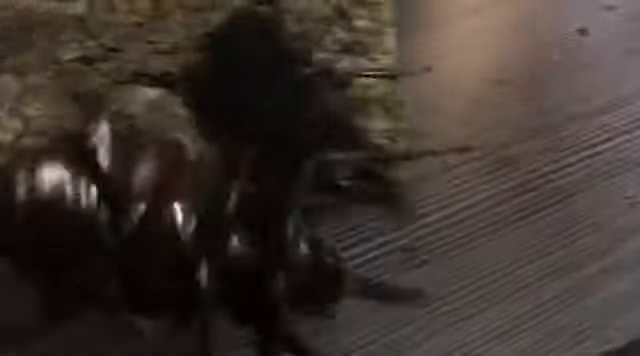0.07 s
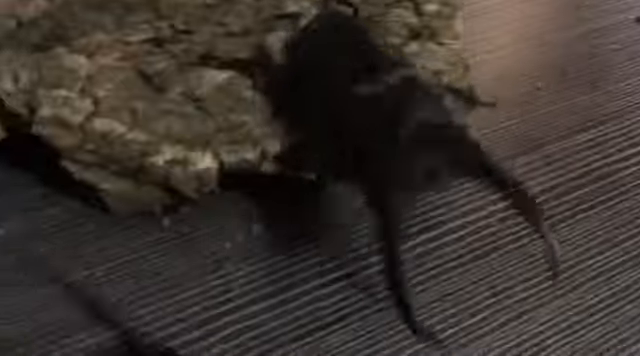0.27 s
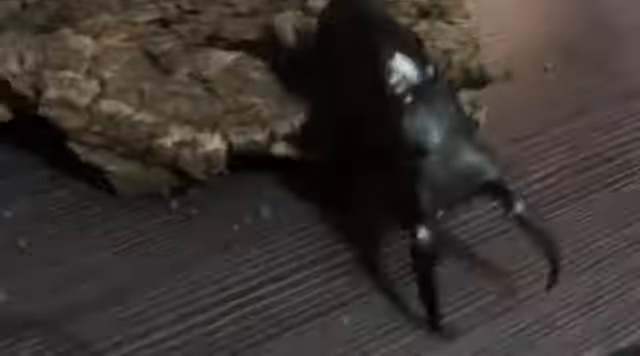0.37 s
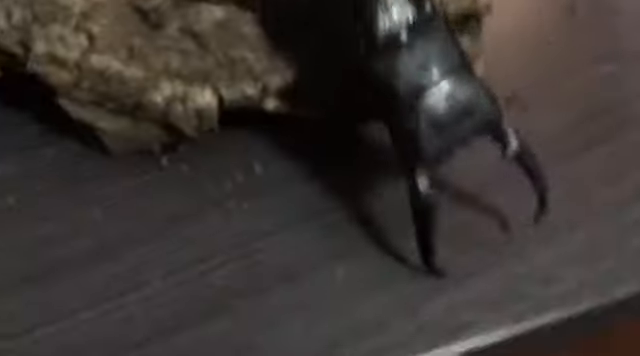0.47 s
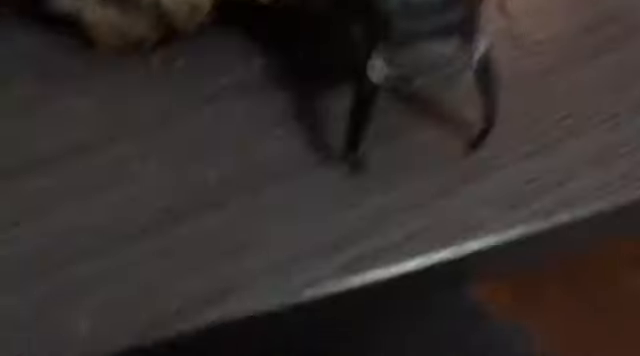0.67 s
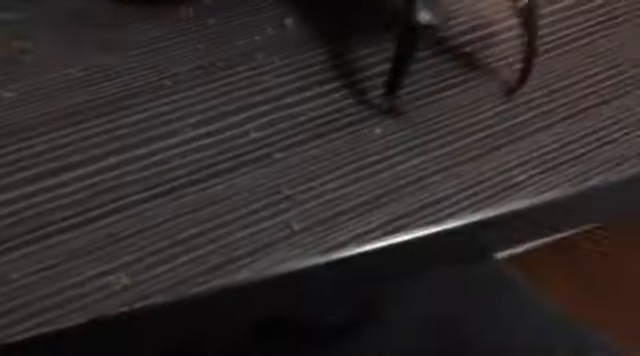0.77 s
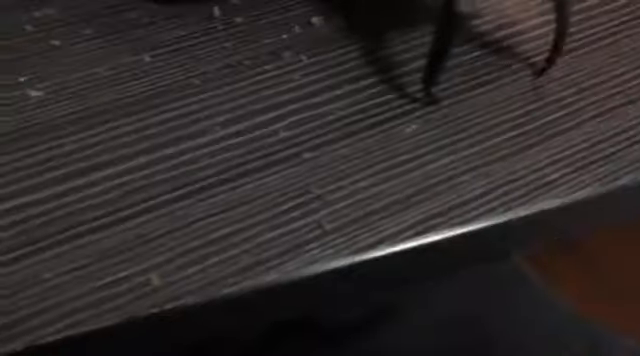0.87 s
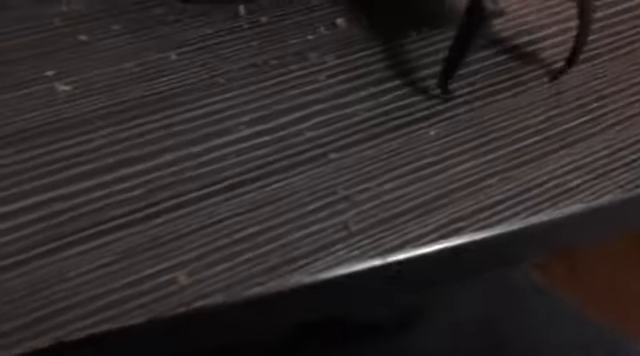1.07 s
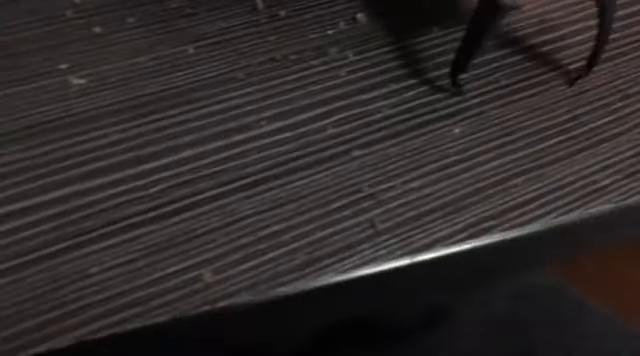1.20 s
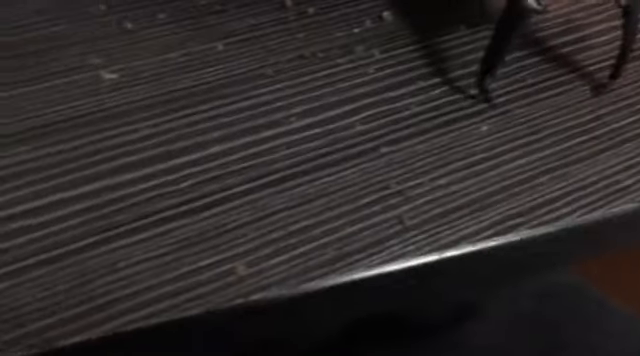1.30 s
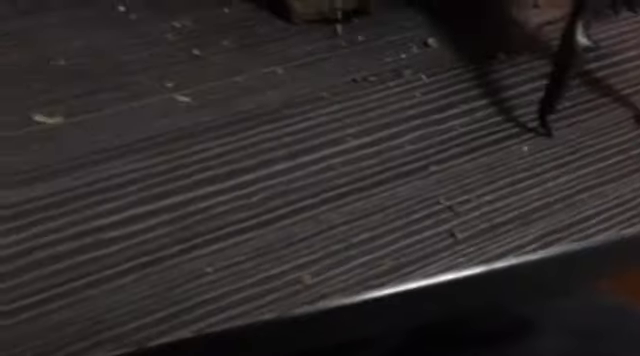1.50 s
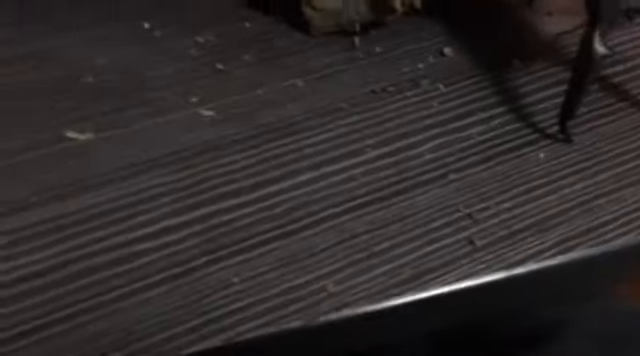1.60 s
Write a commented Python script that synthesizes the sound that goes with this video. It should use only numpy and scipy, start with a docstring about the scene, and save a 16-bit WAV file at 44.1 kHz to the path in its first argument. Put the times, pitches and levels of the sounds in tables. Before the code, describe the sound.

Small clicks and scratches of scuffling beetles, with bark knocking and rattling on wood.

```python
"""Stag beetles scuffling on bark

Two stag beetles scuffle on a piece of bark on a wooden table, close by, in a quiet room.
Claws scratch and shells click. The bark rocks, knocks on the table top and chatters to rest;
shifting weight thuds softly and legs drag over the wood. The room gives a short tail over a low hum."""
import sys
import numpy as np
from scipy import signal
from scipy.fft import rfft, irfft
from scipy.io import wavfile

SR = 44100
rng = np.random.default_rng(int(sys.argv[2]) if len(sys.argv) > 2 else 0)


def to_wav(s):
    """Save 16-bit WAV."""
    ch = np.atleast_2d(s).T  # columns
    pcm = np.round(np.clip(ch, -1, 1) * 32767)  # PCM
    wavfile.write(sys.argv[1], SR, pcm.astype(np.int16))


N = 72765

# Tone of the room air. Each row: frequency in Hz, relative level in dB.
AIR = [(25, -3.5), (45, -9.5), (86, -2), (150, -5.5), (230, -2), (320, -5), (450, -10), (776, -15),
       (1150, -12), (1770, -23), (3380, -35), (12000, -44.5)]
# Level curve of the claws scratching the bark. Each row: time in seconds, level in dB.
SCRATCH = [(0, -73.5), (0.152, -65.5), (.212, -59.5), (.236, -50), (.275, -69), (.33, -52.5), (.45, -56.5),
           (.53, -59), (.6, -57.5), (0.692, -54.5), (.75, -58), (.84, -64.5), (0.931, -63), (1.06, -69),
           (1.25, -73.5), (1.65, -74)]
# EQ of the scratching. Each row: frequency in Hz, gain in dB.
SCRATCH_COLOUR = [(150, -9), (700, 6), (2300, 3), (5000, -2.5), (9000, -4), (13000, -7)]
# Shell and claw clicks. Each row: start in seconds, snap level in dB, ring pitch in Hz,
# ring level in dB over the snap, crunch t60 in seconds.
CLICKS = [(0.0514, -38.5, 6200, -40, 0.023), (0.097, -35, 5590, 11, 0.0025), (0.1565, -45.5, 3000, 27, .01),
          (.176, -34, 6570, 2, 0.0044), (.205, -20.5, 2400, 9.5, 0.0041), (0.2091, -30, 7300, 6, 0.0044),
          (0.2149, -22.5, 8960, 25, 0.0053), (0.2285, -9.5, 5150, 14.5, 0.005),
          (0.253, -18, 8800, 11, 0.019), (.288, -18, 5800, 8, 0.015), (.3046, -10, 6560, 17.5, 0.021),
          (.32, -27, 4500, 15, .008), (0.4257, -12.5, 10900, 10, 0.013), (0.4606, -24, 3920, 10, 0.011),
          (0.654, -42.5, 3600, 28.5, 0.0081), (.681, -22.5, 3920, 18.5, 0.018),
          (0.6868, -22, 8600, -5, 0.047), (0.718, -25.5, 3450, 10, 0.023), (0.7757, -33.5, 3740, 19, 0.013),
          (.87, -25, 8700, 20.5, 0.012), (0.8712, -46, 3560, 33, 0.006),
          (0.9894, -27.5, 8500, 10.5, 0.0048), (0.9912, -40, 3440, 23.5, .005),
          (1.322, -40.5, 4600, 12.5, 0.011)]
# EQ of the clicks. Each row: frequency in Hz, gain in dB.
CLICK_COLOUR = [(100, -36), (1200, -23.5), (2800, -6), (6000, -4.5), (11000, -5.5), (14000, -6)]
# Knocks of bark on table. Each row: start in seconds, bark level in dB, table level in dB,
# ring length as a share of the free ring, bark pitch ratio, place across the table from 0 to 1.
KNOCKS = [(0.2494, -5.5, -5.5, 0.079, 0.92, 0.04), (0.3042, 4, -8, 0.38, 1.067, 0.04),
          (0.3062, 19, 5, 1, 0.99, 0.2), (0.3088, 5, 4, 0.45, 0.97, 0.18),
          (0.4273, -6, -1.5, 0.54, 1.007, 0.46), (0.6817, -8.5, -13, 0.25, 0.93, 0.52),
          (.6875, -10.5, -3, 0.83, 0.85, 0.45)]
# Resonances of the bark. Each row: frequency in Hz, peak in dB, t60 in seconds.
BARK_MODES = [(846, -4.5, 0.087), (1137, -9.5, 0.039), (1904, 6, 0.058), (2160, -1.5, 0.071),
              (2486, 1.5, 0.029), (2880, -11.5, 0.044), (3300, -14, 0.051), (3340, -32, 0.039)]
# Resonances of the table top. Each row: frequency in Hz, peak in dB, t60 in seconds.
TOP_MODES = [(608, 8, 0.05), (761, -1.5, 0.067), (1051, 1, 0.12), (1282, 6.5, 0.092)]
# EQ of the knocks and chatter. Each row: frequency in Hz, gain in dB.
KNOCK_COLOUR = [(100, -5), (450, -12), (700, -1.5), (3200, -0.5), (5000, -4.5), (12000, -3)]
# Weight settling on the table. Each row: start in seconds, level in dB, push length in seconds.
THUDS = [(.252, 14.5, 0.0075), (0.2543, 2, 0.0026), (.327, 10, 0.0052), (0.336, -2, 0.0024),
         (.409, -3, 0.002), (0.469, 1, 0.0069), (0.626, -3.5, 0.0036), (.683, -3.5, 0.0031),
         (.738, -6, 0.0028), (0.808, -0.5, 0.0079), (1.361, -8.5, 0.0045)]
# Low resonances of the table. Each row: frequency in Hz, peak in dB, t60 in seconds.
FRAME_MODES = [(63.4, -3, 0.042), (87, -6, 0.043), (131, -0.5, 0.24), (160.8, -1, 0.072),
               (196.6, -3.5, 0.061), (293, 8.5, 0.18), (346, 3, 0.057)]
# Dull leg drags. Each row: start in seconds, length in seconds, level in dB,
# place of the peak as a share of the length, gain of the table's ring in dB.
DRAGS = [(0.634, 0.035, -68, .42, 2), (0.684, 0.047, -57.5, .35, 0), (1.124, 0.1, -64.5, 0.5, 0),
         (1.25, 0.095, -64.5, .55, -4), (1.338, 0.054, -57.5, .66, 1), (1.498, 0.041, -51, 0.33, 4.5)]
# EQ of the drags. Each row: frequency in Hz, gain in dB.
DRAG_COLOUR = [(100, -9), (450, -18.5), (750, -2.5), (1180, 1), (1600, -5), (2200, -9), (4000, -27),
               (9000, -20), (13000, -29)]
# Decay of the room tail. Each row: frequency in Hz, t60 in seconds.
ROOM_T60 = [(100, 0.81), (300, 0.29), (800, 0.15), (2000, 0.2), (5000, 0.24), (12000, 0.038)]
# EQ of the room tail. Each row: frequency in Hz, gain in dB.
ROOM_COLOUR = [(60, -16.5), (200, -2.5), (450, -5.5), (800, -8), (2200, -14.5), (5000, -18), (12000, -18)]

AIR_DB, HUM_HZ, HUM_DB, HUM_WAVER = -60, 48.7, -57.5, 0.12
GRAINS_PER_S, GRAIN_SPREAD_DB = 7000, 2.2
SHELL_T60_S, CRUNCH_DB = 0.0032, 4
GRIP_S = 0.0069  # time in which the beetles' legs damp the bark
CHATTER_START_S, CHATTER_GAP_S, CHATTER_DB, CHATTER_T60_S = 0.3125, 0.0035, -11.5, 0.25
CHATTER_RING_SHARE, CHATTER_PITCH_SPREAD = 0.24, 0.13
LOW_CUT_HZ, EDGE_HZ, SKIRT_HZ, SKIRT_DB = 38.4, 12250, 14000, -25


def amp(db):
    """Decibels to gain."""
    return 10 ** (np.asarray(db) / 20)


def unit(x):
    """Scales to rms 1."""
    return x / np.sqrt(np.mean(x ** 2) + 1e-20)


def read(points, hz):
    """Reads a curve over log frequency."""
    f, value = np.transpose(points)
    return np.interp(np.log(hz + 1), np.log(f + 1), value)


def add(mix, start, sound):
    """Mixes a sound in at a start time in seconds."""
    part = mix[max(round(start * SR), 0):][:len(sound)]
    part += sound[:len(part)]


def colour(x, points):
    """Minimum-phase EQ, so nothing rings ahead of an attack."""
    log_gain = np.log(amp(read(points, abs(np.fft.fftfreq(8192, 1 / SR)))))
    response = np.exp(np.conj(signal.hilbert(log_gain)))
    taps = np.fft.ifft(response).real[:4096]
    return signal.fftconvolve(x, taps)[:len(x)]


def ring(modes, ring_share=1, size=SR // 2):
    """Struck modes dying away; each level is the height of the resonance."""
    t = np.arange(size) / SR
    out = np.zeros(size)
    for hz, db, t60 in modes:
        rate = np.log(1000) / (t60 * ring_share)
        out += amp(db) * 2 * rate / SR * np.exp(-rate * t) * np.cos(2 * np.pi * hz * t)
    out[0] /= 2
    return out


def room_tone():
    """A bed of soft air and a low, wavering hum."""
    t = np.arange(N) / SR
    waver = sum(np.exp(2j * np.pi * (hz * t + rng.random())) for hz in rng.uniform(-6, 3, size=20))
    waver /= np.sqrt(np.mean(abs(waver) ** 2))
    hum = (np.exp(2j * np.pi * HUM_HZ * t) * (1 + HUM_WAVER * waver)).real
    air_gain = amp(read(AIR, np.fft.rfftfreq(N, 1 / SR)))
    air = irfft(rfft(rng.standard_normal(N)) * air_gain, N)
    return amp(HUM_DB) * unit(hum) + amp(AIR_DB) * unit(air)


def friction():
    """A dense, grainy train of tiny slips of uneven size."""
    size = amp(GRAIN_SPREAD_DB * np.minimum(rng.exponential(1, N), 5))
    return unit(size * rng.standard_normal(N) * (rng.random(N) < GRAINS_PER_S / SR))


def claw_scratch():
    """Claws slip over the bark in a fine crackle."""
    level_db = np.interp(np.arange(N) / SR, *np.transpose(SCRATCH))
    return unit(colour(friction(), SCRATCH_COLOUR)) * amp(level_db)


def shell_clicks():
    """Each click layers a snap, a brief crunch of bark and a very short ring of shell."""
    out, t = np.zeros(N), np.arange(SR // 2) / SR
    for start, db, hz, ring_db, crunch_t60 in CLICKS:
        crunch = rng.standard_normal(len(t)) * amp(-60 * t / crunch_t60)
        shell = ring([(hz, ring_db, SHELL_T60_S)])
        click = amp(CRUNCH_DB) * crunch / np.linalg.norm(crunch) + shell
        click[0] += 1  # the snap
        add(out, start, amp(db) * click)
    return colour(out, CLICK_COLOUR)


def bark_knocks():
    """The bark strikes the table; the beetles' grip chokes it while the table top rings on."""
    out, t = np.zeros(N), np.arange(SR // 2) / SR
    grip = np.exp(-(t / GRIP_S) ** 2)
    for start, bark_db, table_db, ring_share, pitch, place in KNOCKS:
        bark = grip * ring([(hz * pitch, db, t60) for hz, db, t60 in BARK_MODES], ring_share)
        # where the blow lands sets the balance of the table's modes
        table = sum(np.sin(np.pi * k * place) * ring([mode], ring_share)
                    for k, mode in enumerate(TOP_MODES, 1))
        add(out, start, amp(bark_db) * bark + amp(table_db) * table)
    return colour(out, KNOCK_COLOUR)


def table_thuds():
    """Shifting weight pushes softly on the low modes of the table."""
    out = np.zeros(N)
    for start, db, length in THUDS:
        push = np.hanning(int(length * SR) + 3)
        add(out, start, amp(db) * signal.fftconvolve(ring(FRAME_MODES), push / push.sum()))
    return out


def bark_chatter():
    """After its hardest knock the bark bounces to rest, each time on another edge with its own pitch."""
    out = np.zeros(N)
    for k, (late, edge, force) in enumerate(rng.uniform(-0.89, 1, size=(28, 3))):
        delay = (k + late / 2) * CHATTER_GAP_S
        gain = amp(CHATTER_DB - 60 * delay / CHATTER_T60_S) * (1 + force / 2)
        modes = [(hz * (1 + CHATTER_PITCH_SPREAD * edge), db, t60) for hz, db, t60 in BARK_MODES]
        add(out, CHATTER_START_S + delay, gain * ring(modes, CHATTER_RING_SHARE, size=1500))
    return colour(out, KNOCK_COLOUR)


def leg_drags():
    """A sliding leg feeds small slips into the table top, swelling and fading."""
    out, t = np.zeros(N), np.arange(N) / SR
    slips = colour(friction(), DRAG_COLOUR)
    wood = signal.fftconvolve(slips, ring(TOP_MODES))[:N]
    for start, length, db, peak, ring_db in DRAGS:
        swell = np.sin(np.interp((t - start) / length, [0, peak, 1], [0, np.pi / 2, np.pi]))
        out += amp(db) * swell * unit(slips + amp(ring_db) * wood)
    return out


def room_tail(x):
    """A diffuse reverb that lingers in the bass and dies fastest at the very top."""
    hz, t, noise = signal.stft(rng.standard_normal(SR), SR, nperseg=256)
    decay = amp(-60 * t / read(ROOM_T60, hz)[:, None])
    tail = signal.istft(noise * decay, SR)[1]
    tail *= 1 - np.exp(-np.arange(len(tail)) / SR / 0.0006)  # soften the onset
    return signal.fftconvolve(x, colour(tail / np.linalg.norm(tail), ROOM_COLOUR))[:N]


def scene():
    """Close-up beetles, bark and table, mixed in mono with their reverb over the room tone."""
    near = shell_clicks() + bark_knocks() + bark_chatter() + table_thuds() + leg_drags() + claw_scratch()
    return (near + room_tail(near) + room_tone())[None]


def record(dry):
    """The recorder's bass cut and steep treble cut, with a faint skirt of highs above it."""
    x = signal.sosfilt(signal.butter(2, LOW_CUT_HZ, "highpass", fs=SR, output="sos"), dry)
    edge, skirt = (signal.firwin(255, hz, window=("kaiser", 7), fs=SR) for hz in (EDGE_HZ, SKIRT_HZ))
    treble_cut = edge + amp(SKIRT_DB) * (skirt - edge)
    return signal.oaconvolve(x, treble_cut[None], "same")


dry = scene()
out = record(dry)
to_wav(out)
```